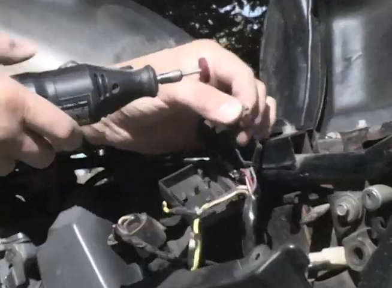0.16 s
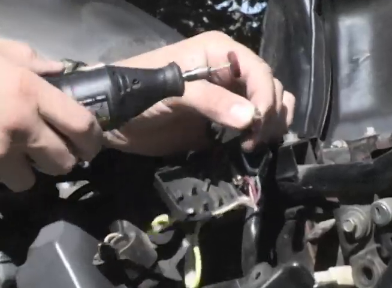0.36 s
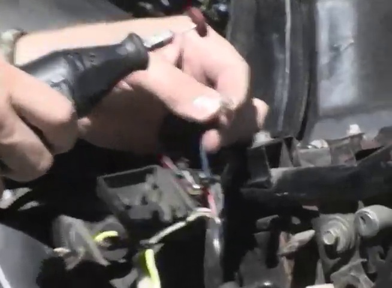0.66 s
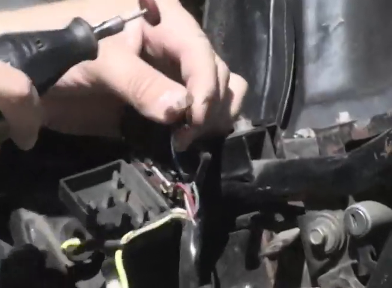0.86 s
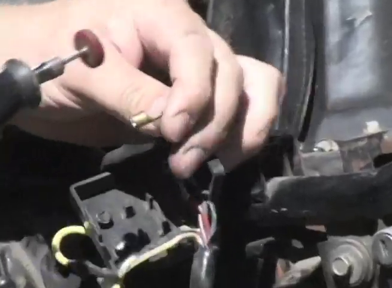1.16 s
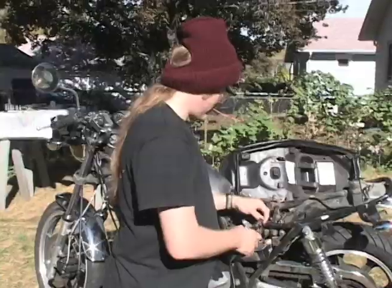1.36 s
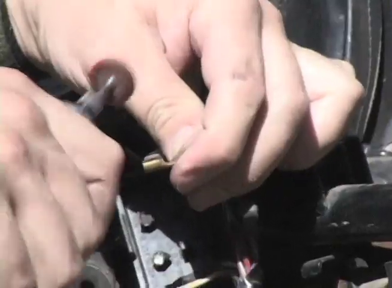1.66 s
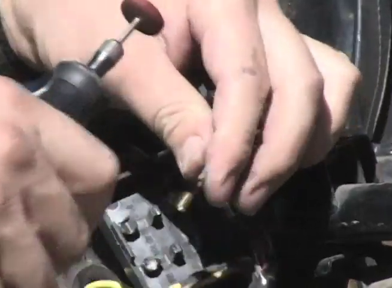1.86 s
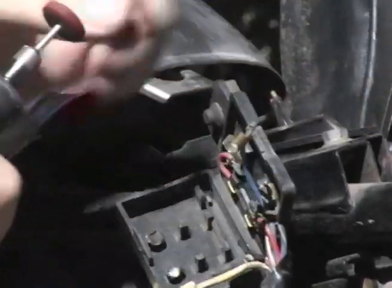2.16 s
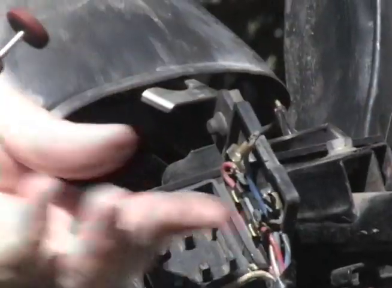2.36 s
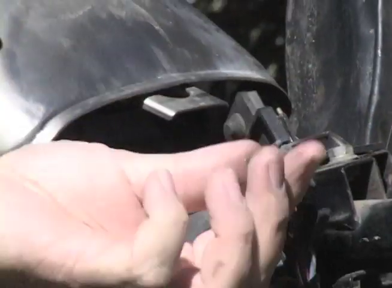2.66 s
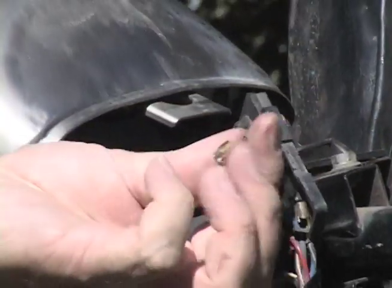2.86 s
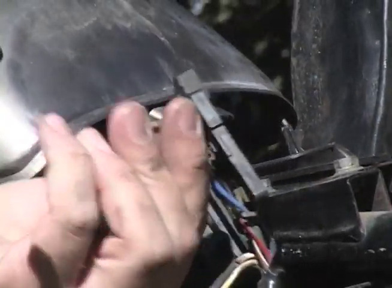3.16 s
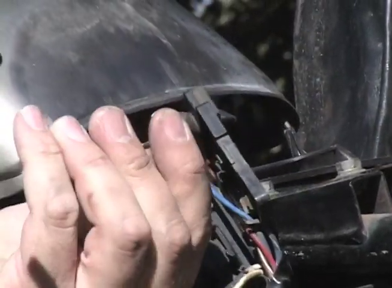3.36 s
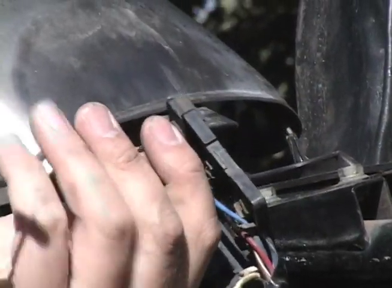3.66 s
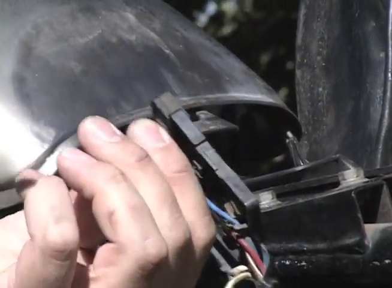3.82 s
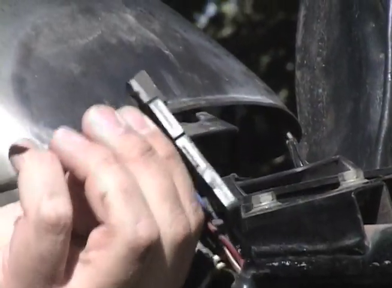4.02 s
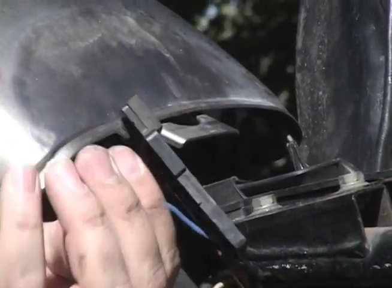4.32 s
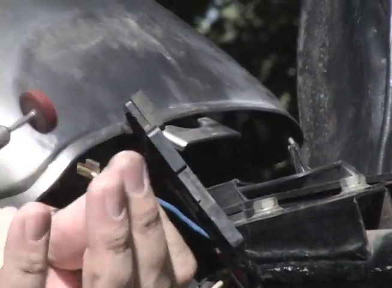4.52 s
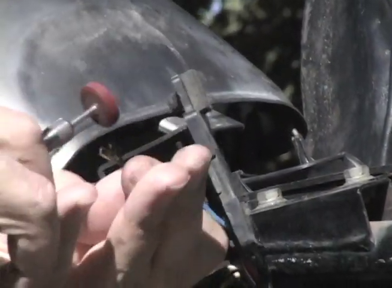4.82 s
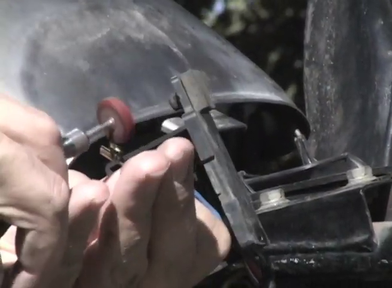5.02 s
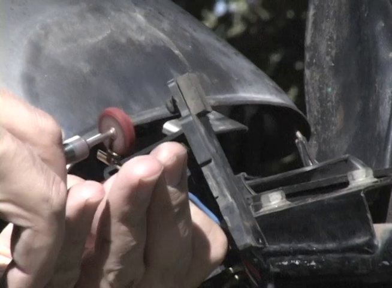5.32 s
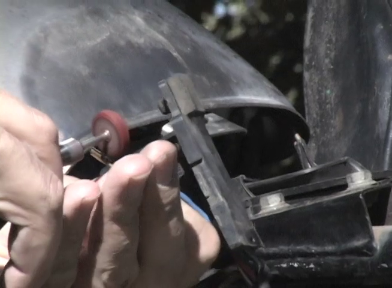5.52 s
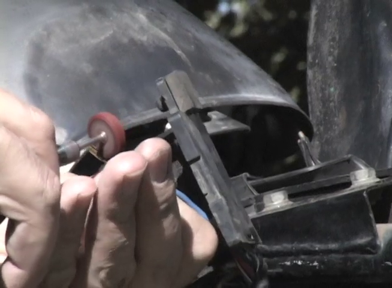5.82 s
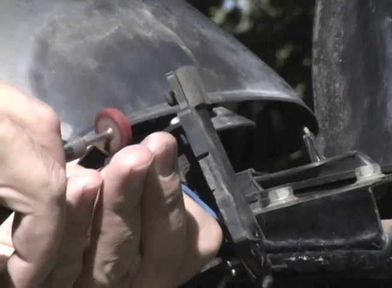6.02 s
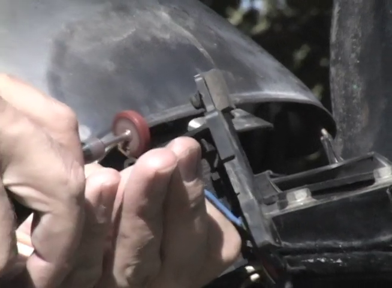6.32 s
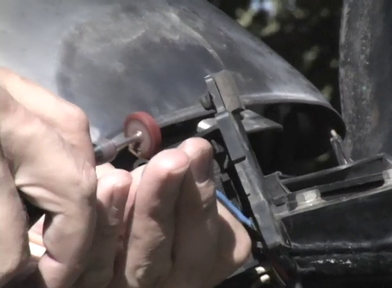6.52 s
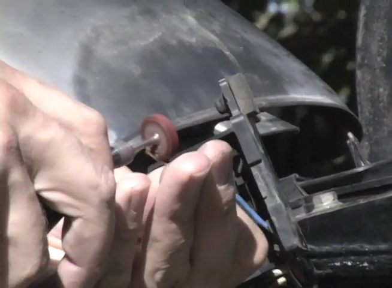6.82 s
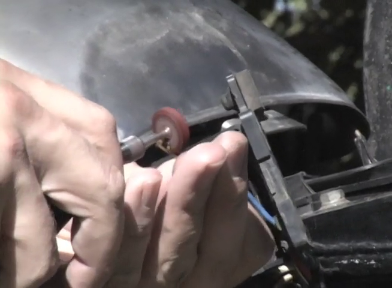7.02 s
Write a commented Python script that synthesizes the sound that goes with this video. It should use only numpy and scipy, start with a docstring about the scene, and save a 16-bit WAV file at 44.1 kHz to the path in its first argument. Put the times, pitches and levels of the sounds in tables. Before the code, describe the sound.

A low, quiet outdoor rumble lies under everything, with a few faint, hoarse, falling bird calls far away in the first second or so. At about 0.5 seconds a plastic slide switch snaps close to the microphone and a handheld electric rotary tool starts. Its buzzing whine rises quickly, then more gradually, with brief ringing flares, and reaches high speed around 3 seconds. It runs on with a piercing whine, rushing fan air and a fine hiss. The tone shifts as the tool is turned, becoming airier from about 3.5 to 5 seconds. From around 5 seconds the small polishing wheel lightly rubs a brass terminal, adding a thin, bright rasp. It bites three times in quick succession between 6.4 and 6.8 seconds, and the motor's pitch sags slightly under the pressure, still running at the end, just after 7 seconds.

```python
"""Far birds call over outdoor rumble; a close switch snaps and a mains rotary tool spins up to 17000 rpm.
Its eight-slot rotor whines in the housing, throbbing with every mains half cycle; its tones flare as
they cross the case's resonances, and the fan blows through the vents.
Near the end the small polishing wheel rubs a brass terminal and the motor slows."""
import sys
import numpy as np
from scipy import signal
from scipy.fft import rfft, irfft, next_fast_len
from scipy.io import wavfile
from scipy.ndimage import uniform_filter1d

SR = 44100
rng = np.random.default_rng(int(sys.argv[2]) if len(sys.argv) > 2 else 0)


def persist_wave(psi):
    """Save psi, clipped to +-1, as 16-bit WAV."""
    counts = np.round(np.clip(psi, -1, 1) * 32767).astype(np.int16)
    wavfile.write(sys.argv[1], SR, np.atleast_2d(counts).T)


N = 316638
T = np.arange(N) / SR


def undb(db):
    """Decibels to gain."""
    return 10 ** (np.asarray(db) / 20)


def unit(x):
    """Scale to rms 1."""
    return x / np.sqrt(np.mean(x ** 2))


def curve(points):
    """Straight lines through (time_s, value) points."""
    return np.interp(T, *np.transpose(points))


def bump(centre_s, half_s):
    """Gaussian in time, peak 1."""
    return np.exp(-((T - centre_s) / half_s) ** 2)


def noise():
    """White noise."""
    return rng.standard_normal(N)


def walk(rate_hz):
    """Smooth random drift, rms 1."""
    step = int(SR / rate_hz)
    return unit(uniform_filter1d(np.repeat(rng.standard_normal(N // step + 1), step), step)[:N])


def colour(x, points):
    """Filter by a spectrum of (freq_hz, gain_db) points; rms 1."""
    hz, db = np.transpose(points)
    size = next_fast_len(N)
    bins_hz = np.arange(size // 2 + 1) * SR / size
    gain = undb(np.interp(np.log(bins_hz + 1), np.log(hz), db))
    return unit(irfft(rfft(x, size) * gain, size)[:N])


def ring(x, hz, width_hz):
    """One resonance, gain 1 at its centre."""
    return signal.lfilter(*signal.iirpeak(hz, hz / width_hz, fs=SR), x)


def grit(angle, wear_hz):
    """Surface roughness met again each turn; wears into a new pattern at about wear_hz."""
    around = np.linspace(0, 2 * np.pi, 2048, endpoint=False)
    out = 0
    for _ in range(4):
        surface = signal.resample(rng.standard_normal(120), len(around))
        out += walk(wear_hz) * np.interp(angle % (2 * np.pi), around, surface)
    return out / np.sqrt(uniform_filter1d(out ** 2, size=882) + 1e-12)


def outdoors():
    """Low outdoor rumble; the recorder's gain dips 2 dB as the motor starts."""
    # recorder gain dip, applied to the rumble: time_s, gain_db
    gain_dip = [(.5, 0), (1.1, -2)]
    # rumble spectrum: freq_hz, gain_db
    spectrum = [(25, -16), (42, -37), (62, -12), (85, -4), (150, -3), (270, 1.5), (450, -0.5), (800, -4),
                (1300, -4), (2200, -15.5), (3600, -13.5), (5000, -19), (9000, -24), (15500, -26.5)]
    return undb(-50 + curve(gain_dip) + 0.53 * walk(5.3)) * colour(noise(), spectrum)


def birds():
    """Hoarse falling calls, blurred by distance."""
    # far calls: start_s, length_s, pitch_hz, gain_db
    calls = [(.01, 0.14, 3680, -55.5), (0.118, 0.29, 1370, -46), (0.545, 0.18, 1503, -46.5),
             (1.035, 0.16, 1464, -44)]
    out = 0
    for start_s, length_s, hz, db in calls:
        age = np.clip((T - start_s) / length_s, 0, 2)
        pitch_hz = hz * (1 - 0.058 * age ** 2 + 0.032 * walk(300))
        swell = (age / 0.4) ** 2 * np.exp(2 - 2 * age / 0.33) * (1 - age / 2)
        rasp = 1 + 0.6 * walk(120)
        out += undb(db + 4) * swell * rasp * np.sin(2 * np.pi * np.cumsum(pitch_hz) / SR)
    return out


def clicks():
    """Slide switch and finger ticks ring the plastic shell."""
    # snaps: start_s, peak_db, t60_s, tilt_db_per_octave
    snaps = [(0.376, -50, .02, -6), (0.394, -43, 0.0092, 4), (0.495, -26, 0.0083, 7),
             (0.4985, -30, 0.023, 0), (0.501, -31, 0.025, -11), (.5763, -41, .004, 18)]
    # shell modes: freq_hz, width_hz, gain_db
    modes = [(2930, 700, -11), (4060, 480, 5), (5940, 330, 1.5), (9300, 770, -14)]
    out = np.zeros(N)
    t = T[:SR // 16]
    for start_s, peak_db, t60_s, tilt in snaps:
        push = rng.standard_normal(len(t)) * np.exp(-np.log(1000) * t / t60_s)
        snap = sum(undb(db + tilt * np.log2(hz)) * ring(push, hz, width) for hz, width, db in modes)
        start = int(start_s * SR)
        out[start:start + len(t)] += undb(peak_db) * snap / np.abs(snap).max()
    return out


def shaft(start_s=.5, free_hz=286.36, touch_s=4.895, press_s=6.474):
    """Shaft rate and its loss to drag: the wheel touches lightly, then is pressed ever harder."""
    quick_share, quick_s, slow_s = .364, .2647, .8269
    age_s = np.maximum(T - start_s, 0)
    spin_up = 1 - quick_share * np.exp(-age_s / quick_s) - (1 - quick_share) * np.exp(-age_s / slow_s)
    sag_hz = 1.309 * np.maximum(T - touch_s, 0) + 70.1 * np.maximum(T - press_s, 0) ** 2.222
    return np.maximum(free_hz * spin_up - sag_hz, 0), sag_hz


def current(mains_hz=60):
    """The speed control passes only the late part of each mains half cycle."""
    phase = (2 * mains_hz * T) % 1
    return unit(np.sin(np.pi * phase) * np.clip((phase - .72) / .06, 0, 1))


def cavities(modes):
    """Steep-skirted resonances, each blown by its own turbulence."""
    return unit(sum(undb(db) * ring(ring(noise(), hz, 1.3 * width), hz, 1.3 * width)
                    for hz, width, db in modes))


def fan(angle, surge, speed, speed_db, facing):
    """The fan roars and hums through the vents; its air rushes past the housing."""
    # cavities behind the vents: freq_hz, nominal_width_hz, gain_db
    vents = [(999, 63, 2), (1292, 226, 1.5), (1512, 46, 0.5), (1735, 142, -1.5), (547, 345, -9.5)]
    # cavities added as the vents face the microphone: freq_hz, nominal_width_hz, gain_db
    facing_vents = [(917, 84, 6), (1109, 90, 5.5)]
    # fan tones against the roar: shaft_order, gain_db, facing_db
    tones = [(1, -18, 2.5), (2, -20.5, 1), (3, -20, 8.5), (4, -16, 5), (6, -19.5, 5), (36, -22.5, 10.5)]
    # rushing air: freq_hz, gain_db
    rush_spectrum = [(200, -45), (700, -2.5), (1600, -6), (1950, 7.5), (2400, 5), (2850, 0.5), (3400, 2.5),
                     (3800, 0), (4400, 7), (5300, -2), (6400, 2), (7400, -5), (9000, -12.5), (15000, -28)]
    roar = (cavities(vents) + 0.93 * facing * cavities(facing_vents)) / np.sqrt(1 + facing ** 2)
    hum = np.sqrt(2) * sum(undb(db + facing_db * facing + 1.2 * walk(9)) * np.sin(order * angle)
                           for order, db, facing_db in tones)
    hum *= np.minimum(speed / 0.79, 1) ** 3
    rush = colour(noise() * (1 + 0.01 * surge), rush_spectrum)
    vent_db = -46 + 2.8 * facing + speed_db + .5 * walk(9.8)
    rush_db = -42 - 0.1 * facing + 1.25 * speed_db + .5 * walk(13)
    return undb(vent_db) * (roar + hum) + undb(rush_db) * rush


def hiss(angle, surge, speed_db, facing):
    """Brushes hiss on the commutator; vent hiss takes over as the vents face the microphone."""
    # brush hiss: freq_hz, gain_db
    brush_spectrum = [(4000, -24), (7000, -13), (8000, 4.5), (8700, -8), (9800, 0), (10800, -3.5),
                      (11600, 5), (12500, -3.5), (13500, 0.5), (15500, -16)]
    # vent hiss: freq_hz, gain_db
    vent_spectrum = [(4000, -16), (7000, 2.5), (8300, -1), (10000, 5), (11500, -1), (13000, -10),
                     (15500, -22)]
    brushes = colour((.55 * grit(angle, 1.5) + noise()) * (1 + .08 * surge), brush_spectrum)
    vents = colour(noise() + 0.13 * grit(angle, 1.64), vent_spectrum)
    level_db = -56 + 7.9 * facing + 1.36 * speed_db
    return undb(level_db) * (np.sqrt(1 - facing) * brushes + np.sqrt(facing) * vents)


def wheel(angle, sag_hz, rub_db=-46.3, ref_sag_hz=14, bite_half_s=0.044):
    """The wheel's high side scrapes the brass once a turn, louder as the drag grows."""
    # rubbed brass: freq_hz, gain_db
    brass = [(400, -53), (2000, -2), (3400, 11), (5000, -8), (6500, -31), (8500, -5), (10100, 9.5),
             (11000, 0), (11800, 4), (13000, -6), (15500, -8)]
    # the wheel bites in: centre_s, boost_db
    bites = [(6.43, 7), (6.58, 7), (6.73, 7)]
    bite_db = sum(db * bump(centre_s, bite_half_s) for centre_s, db in bites)
    rub = (sag_hz / ref_sag_hz) ** .35 * undb(rub_db + bite_db)
    contact = .2 + ((1 + np.cos(angle)) / 2) ** 2.5
    scrape = contact * undb(2 * walk(60)) * (grit(angle, 18) + .5 * noise())
    return rub * colour(scrape, brass)


def weak_tones(angle, speed):
    """Faint motor tones; those near the commutator's 16th order keep in step and beat once a turn."""
    # tones: shaft_order, gain_db
    tones = [(7, -61.5), (10, -53), (12, -56), (14, -48.5), (21, -57), (22, -54), (23, -77), (25, -57),
             (27, -67), (29, -73)]
    out = 0
    for order, db in tones:
        lag_rad = .55 * abs(order - 16) * walk(1.5)
        sway_db = 2 * walk(2.44) + 1.7 * walk(25)  # the hand moves the tool's sound beams
        out += undb(db - 4.5 + sway_db) * np.sin(order * angle + lag_rad)
    return np.sqrt(2) * speed ** 3 * out


def tone_levels(shaft_hz, speed, facing, case_floor_db=-15):
    """Gain in dB by shaft order; commutator tones flare on crossing a case resonance."""
    # commutator tones: shaft_order, gain_db, facing_db, labour_db
    tones = [(15, -40, 2.5, -12.5), (16, -35.5, -8.5, 0.5), (17, -55.5, -18, 7.5), (18, -45, 9, -4.5)]
    # case resonances: freq_hz, width_hz, gain_db
    case = [(2335, 300, -12), (3470, 240, -2.5), (3920, 31, -10), (4170, 77, -4.5), (4350, 18, -1.5),
            (4470, 135, 0), (4563, 57, -4), (4690, 43, 1), (4838, 98, 8.5), (5010, 32, 4.5)]
    # one tone swells or fades as the hand turns the tool: centre_s, half_s, shaft_order, change_db
    swells = [(0.846, 0.038, 24, 2.5), (1.437, 0.045, 18, 11), (1.6, 0.1, 16, -15), (1.66, 0.085, 18, 4.5),
              (1.755, 0.031, 16, 4), (2.237, 0.11, 16, 7.5), (2.414, 0.072, 16, -5), (2.65, 0.32, 15, 8),
              (2.777, .07, 18, 1), (2.938, 0.097, 16, -10), (3.224, 0.18, 16, 2), (3.75, 0.19, 17, 10),
              (4.044, 0.066, 16, -15), (4.2, 0.41, 15, -3), (4.35, 0.09, 16, -8), (4.582, .07, 18, -7),
              (4.82, 0.39, 15, 4), (5.33, .1, 15, -5), (5.375, 0.086, 16, -11), (5.85, 0.4, 24, -14),
              (6.65, 0.21, 24, 8), (6.83, .06, 17, -7), (7.025, 0.066, 17, 3), (7.108, 0.035, 18, 14)]
    labour = 1 - np.exp(-(1 - speed) / 0.028)  # 0 at top speed, near 1 well below it
    levels_db = {24: -58 + 8.5 * labour}  # third harmonic of the rotor slots
    for order, db, facing_db, labour_db in tones:
        flare = sum(undb(mode_db) ** 2 / (1 + (2 * (order * shaft_hz - hz) / width) ** 2)
                    for hz, width, mode_db in case)
        case_db = 10 * np.log10(undb(case_floor_db) ** 2 + flare)
        levels_db[order] = db + case_db + facing_db * facing + labour_db * labour
    for centre_s, half_s, order, change_db in swells:
        levels_db[order] += change_db * bump(centre_s, half_s)
    return levels_db


def strong_tones(angle, surge, speed, levels_db):
    """Commutator and slot tones; uneven torque makes them buzz at low speed, and they clear at speed."""
    strain = np.clip(.96 - speed, 0, 1)
    torque = uniform_filter1d(uniform_filter1d(surge, size=110), size=80)  # rotor mass rounds each surge
    torque = unit(torque - torque.mean())
    throb = np.clip(.05 + 1.2 * strain, 0, .55)
    pulse = (1 + throb * torque) / np.sqrt(1 + throb ** 2)
    # higher slot harmonics stand out only at low speed
    upper_db = levels_db[24] - 16.5 + 13 * np.clip(3 * strain, 0, 1)
    out = 0
    for order, db in (*levels_db.items(), (32, upper_db), (40, upper_db - 9)):
        swing_rad = np.clip(.16 + strain * order / 5, 0, 1.1) * np.roll(torque, shift=60)
        rattle_rad = (.04 + strain * order / 36) * walk(260)
        out += undb(db - 1.2 + walk(17)) * pulse * np.sin(order * angle + swing_rad + rattle_rad)
    return np.sqrt(2) * out


def whine(angle, surge, facing):
    """Rotor slots tug at the stator with each current surge; the housing picks out nearby harmonics."""
    # housing modes: freq_hz, width_hz, gain_db, facing_db
    modes = [(2407, 47, 7, -3.5), (2567, 61, -20, -3.5), (2627, 34, -24, 34)]
    # grip shifts damp or free those modes: centre_s, half_s, mode1_db, mode2_db, mode3_db
    regrips = [(2.55, 0.46, -12, 4, 3), (3.75, 0.44, -7.5, 0, 7), (5.314, 0.33, -21, 32, -11)]
    # whine envelope: time_s, level_db
    envelope = [(0.55, -43), (0.66, -52), (0.95, -46.5), (1.06, -50.5), (1.57, -41), (2.15, -42.5),
                (2.87, -28), (3.52, -37), (4.44, -35), (4.65, -30.5), (5.09, -33.5), (5.26, -30.5),
                (5.37, -35.5), (5.67, -29.5), (6.68, -31), (6.82, -32.5), (6.95, -31.5), (7.1, -30.5)]
    slots = np.sin(8 * angle) + np.sin(16 * angle) / 3 + np.sin(24 * angle) / 3 + np.sin(32 * angle) / 4
    force = (surge + 0.19) * (slots + 0.071 * noise())
    broad = undb(-2) * ring(force, 2650, 580) + undb(-13) * ring(force, 1926, 130)
    narrow = 0
    for k, (hz, width, db, facing_db) in enumerate(modes):
        grip_db = sum(change_db[k] * bump(centre_s, half_s) for centre_s, half_s, *change_db in regrips)
        narrow += undb(db + facing_db * facing + grip_db) * ring(force, hz, width)
    shell = ring(broad + narrow, 2306, 253)
    shell -= 2 * ring(shell, 2460, 135)  # the case rings on, which rounds the throb
    running_rms = np.sqrt(uniform_filter1d(shell ** 2, size=13230) + 1e-12)
    return undb(curve(envelope)) * shell / running_rms


def scene():
    """Tool, wheel and outdoors at one microphone, the same in both channels."""
    # how far the vents face the microphone (scales each facing_db): time_s, share
    vent_aim = [(2.3, 0.3), (3.0, 0.36), (3.4, 0.78), (5.1, 0.81), (5.45, 0.07), (7.18, 0.03)]
    facing = curve(vent_aim)
    shaft_hz, sag_hz = shaft()
    speed = shaft_hz / shaft_hz.max()
    speed_db = 20 * np.log10(speed + 1e-6)
    angle = 2 * np.pi * np.cumsum(shaft_hz * (1 + 0.00015 * walk(20))) / SR
    surge = current()
    housing = whine(angle, surge, facing)
    levels_db = tone_levels(shaft_hz, speed, facing)
    tones = strong_tones(angle, surge, speed, levels_db) + weak_tones(angle, speed)
    motor = np.minimum(speed / 0.071, 1) * housing + np.minimum(speed / 0.4, 1) ** 2 * tones
    rumble = outdoors()
    air = fan(angle, surge, speed, speed_db, facing) + hiss(angle, surge, speed_db, facing)
    mono = rumble + motor + air + wheel(angle, sag_hz) + clicks() + birds()
    return np.array([mono, mono])


def record(dry):
    """Steep low-pass on the top treble."""
    cutoff_hz = 15750
    return signal.sosfilt(signal.ellip(10, .2, 80, cutoff_hz, fs=SR, output="sos"), dry)


dry = scene()
out = record(dry)
persist_wave(out)
```